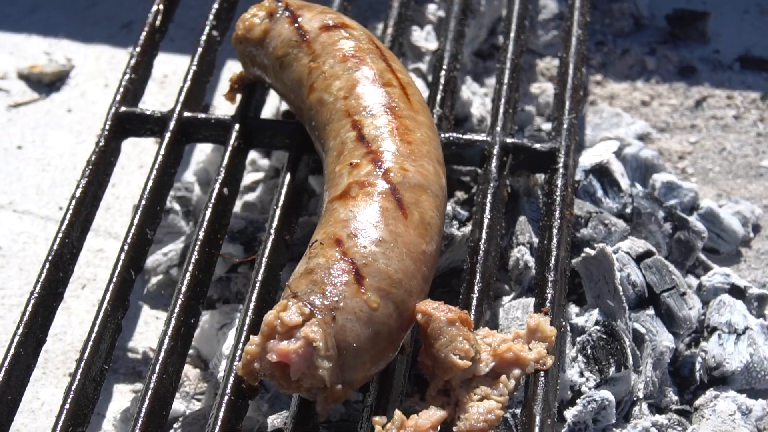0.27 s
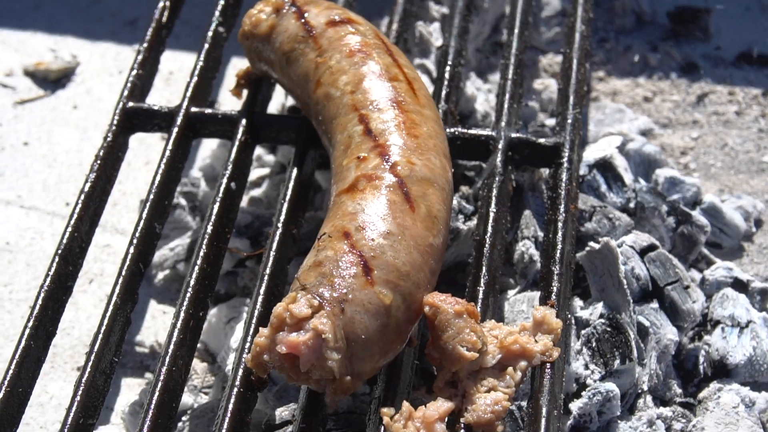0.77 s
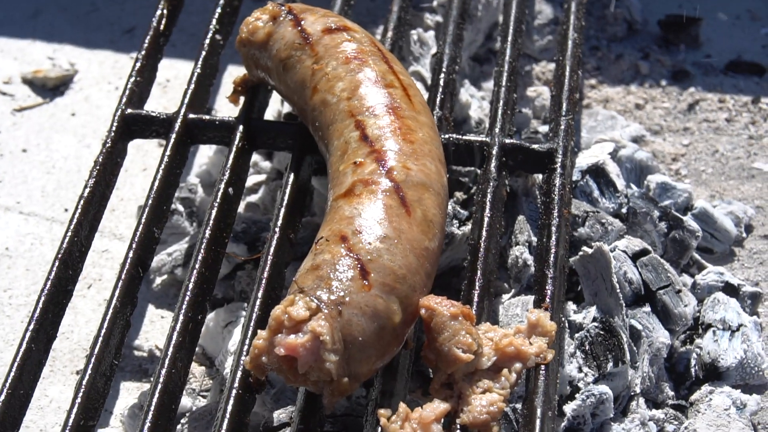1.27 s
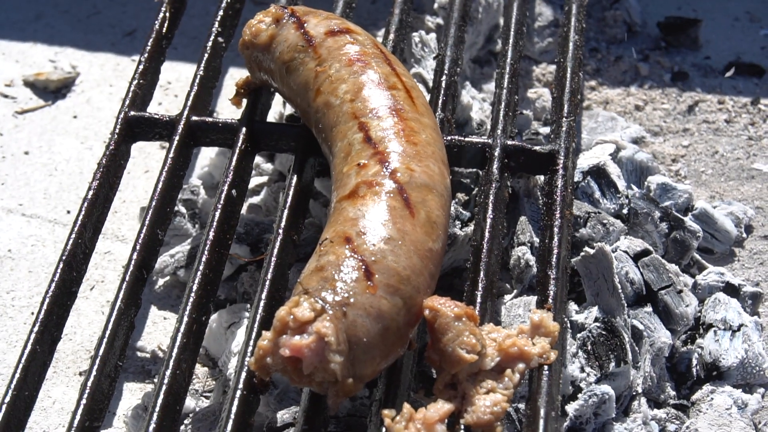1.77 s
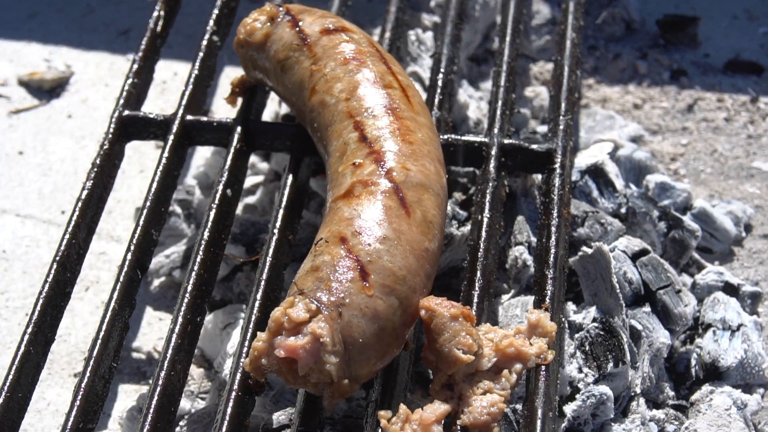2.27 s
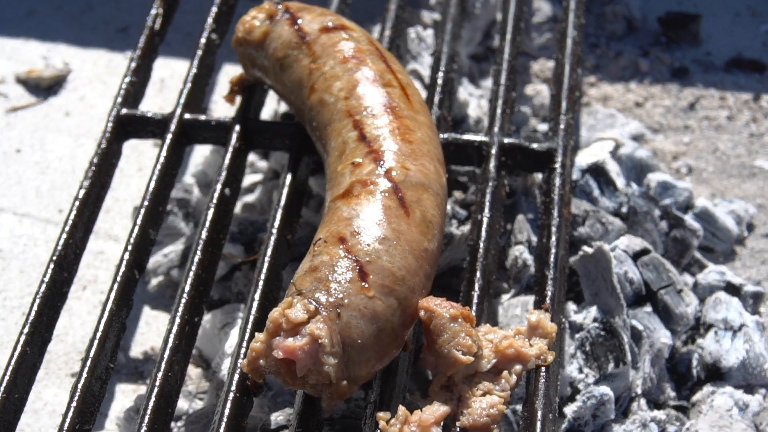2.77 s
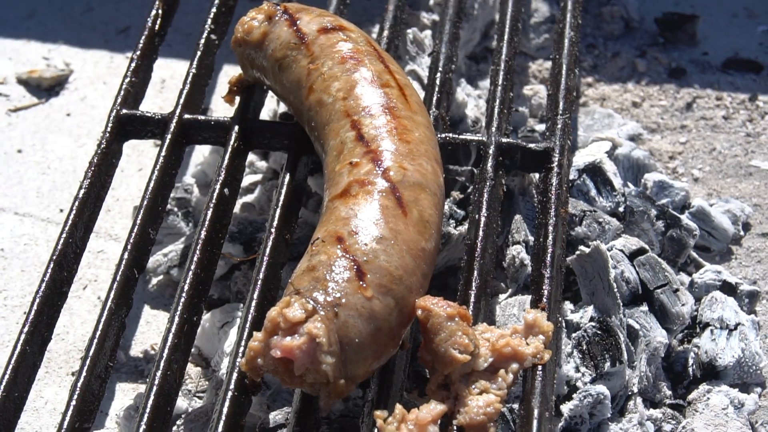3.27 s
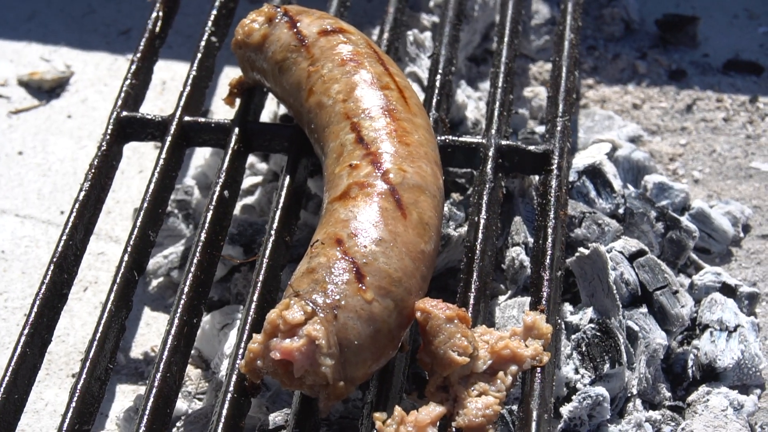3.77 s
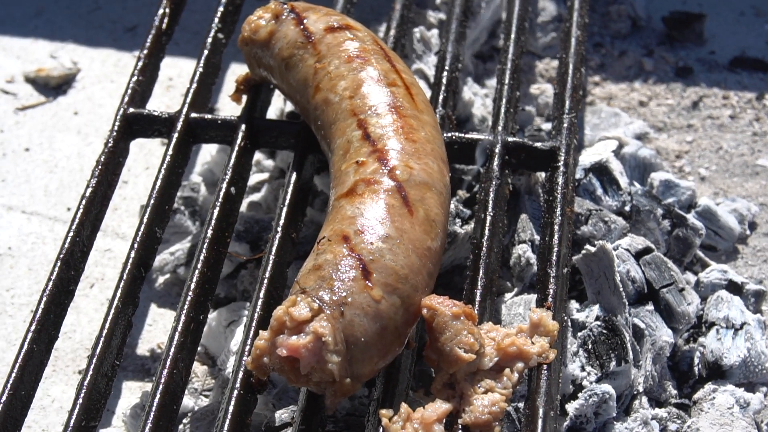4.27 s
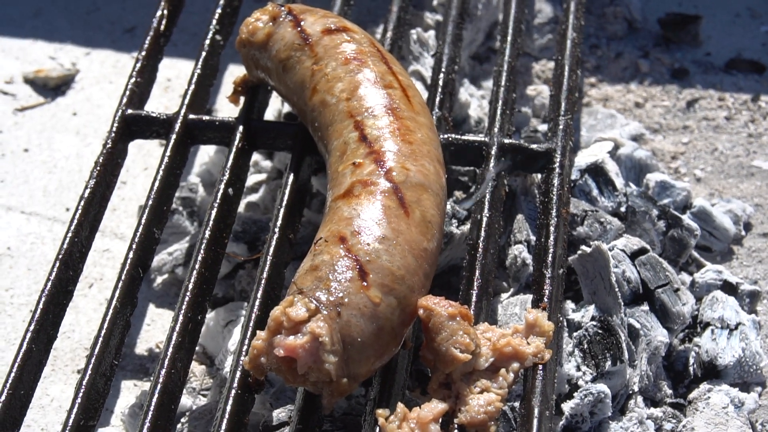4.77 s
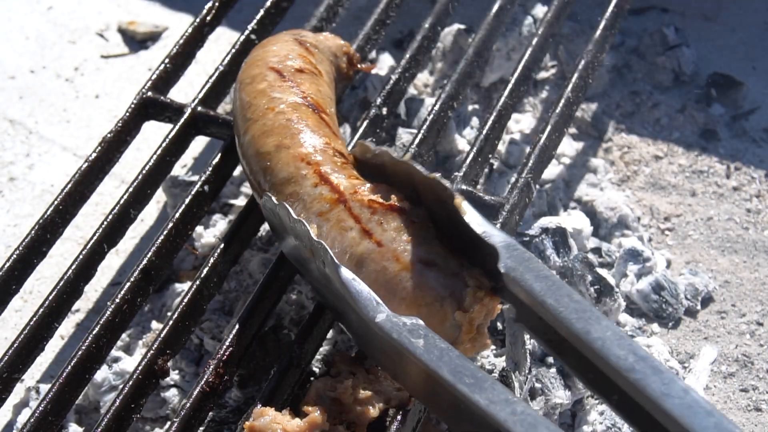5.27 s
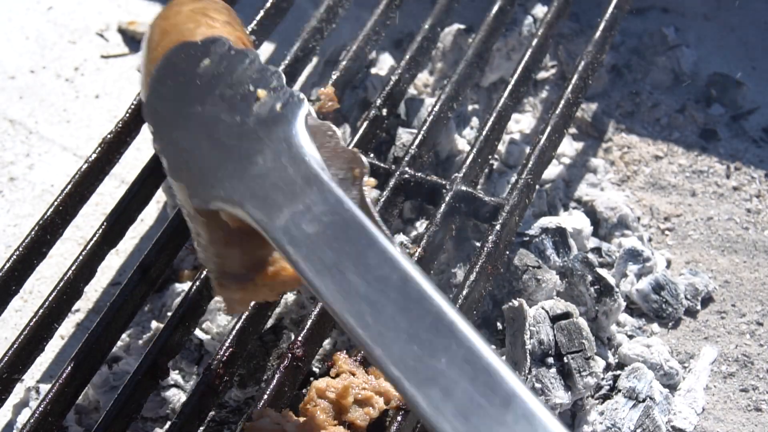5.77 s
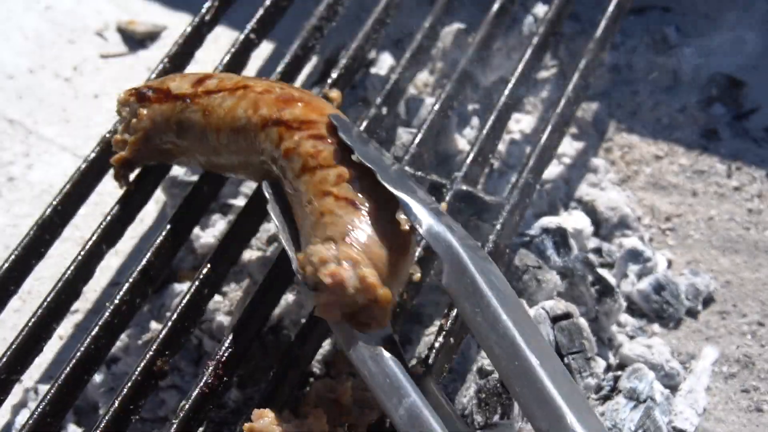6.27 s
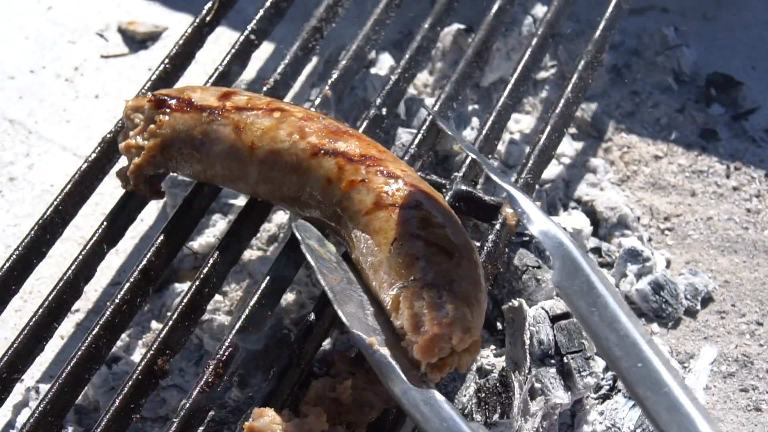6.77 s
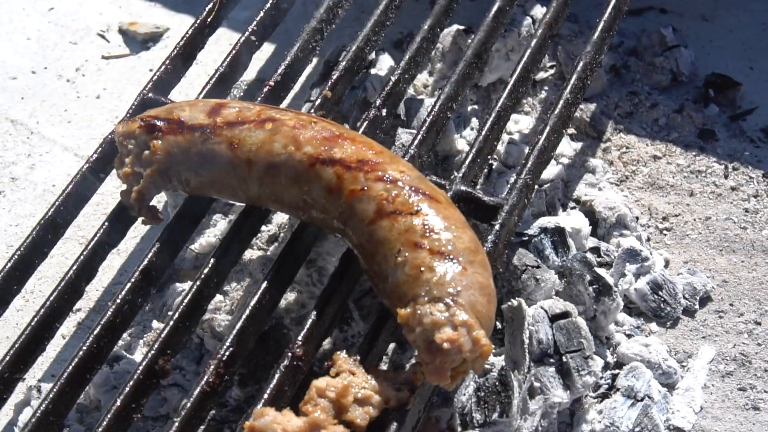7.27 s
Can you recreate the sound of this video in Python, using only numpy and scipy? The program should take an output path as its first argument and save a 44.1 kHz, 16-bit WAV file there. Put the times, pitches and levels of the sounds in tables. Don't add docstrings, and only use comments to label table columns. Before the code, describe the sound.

Sausage fat sizzles and spits close up over embers outdoors, wind thumping the microphone, while steel tongs knock the grate twice and frying grows livelier.

```python
import sys
import numpy as np
from scipy import signal
from scipy.fft import rfft, irfft, next_fast_len
from scipy.io import wavfile
from scipy.ndimage import uniform_filter1d

SR = 44100
rng = np.random.default_rng(int(sys.argv[2]) if len(sys.argv) > 2 else 0)


def magnitude_from_level(level_db):
    exponent = np.asarray(level_db, float) / 20
    return 10 ** exponent


def generate_wav(signal):
    frames = np.transpose(np.atleast_2d(signal))
    scaled = np.clip(frames, -1, 1) * 32767
    pcm = np.round(scaled).astype(np.int16)
    wavfile.write(sys.argv[1], SR, pcm)


N = 332073
PADDED = next_fast_len(N + SR // 2)

# (frequency [Hz], level [dB per Hz])
FAR_HUM = [(20, -1), (70, -4.5), (110, 3.5), (250, 0.5), (400, -2.5), (700, -22)]
FAR_HUM_DB = -61
# (frequency [Hz], level [dB per Hz])
WIND_SPECTRUM = [(8.8, -51.5), (15, -2.5), (40, -3), (65, -5), (90, -8.5), (150, -20), (300, -41.5),
                 (660, -100)]
# (time [s], level [dB])
BREEZE = [(0.0, -69), (0.19, -66), (0.46, -53), (0.62, -43.5), (1.6, -47), (1.95, -54), (2.35, -44),
          (2.75, -50), (3.05, -40), (3.44, -44), (3.7, -48.5), (4.05, -50), (4.36, -54), (4.78, -51),
          (5.2, -60.5), (6.08, -65.5), (6.82, -52), (7.5, -58.5)]
BREEZE_UPPER_DB = -10.5
# (time [s], peak [dB], length [s], upper part over deep part [dB])
GUSTS = [(0.254, -40, 0.029, -1), (0.367, -24.5, 0.032, -8), (0.516, -40.5, 0.058, -7.5),
         (0.803, -39.5, .08, -19), (.92, -58, 0.064, 4), (1.103, -46, 0.048, 7.5), (1.444, -53, 0.16, 8.5),
         (1.679, -29.5, 0.027, -9.5), (1.724, -52, 0.022, 7.5), (2.055, -47.5, .04, -1.5),
         (2.184, -27.5, 0.043, -12.5), (2.466, -51, 0.02, 11.5), (2.837, -47, 0.058, 7),
         (3.062, -42, 0.055, 5.5), (3.272, -46, 0.073, -14), (3.521, -33.5, 0.041, -6),
         (3.823, -54.5, 0.053, 5), (4.002, -40.5, .05, -2.5), (4.13, -47, .05, -5), (4.233, -47, 0.032, -4),
         (4.322, -52, 0.031, -2), (4.486, -53, 0.015, -1), (4.56, -48, 0.026, -8), (4.735, -52, 0.026, -7),
         (4.837, -50.5, 0.016, -2), (5.17, -58, 0.015, -16), (6.948, -40, 0.047, -15)]
# (frequency [Hz], level [dB per Hz])
CAPSULE_HISS = [(30, 7), (100, -3), (400, -3), (2000, -9.5), (5000, -8), (16000, -5)]
CAPSULE_HISS_DB = -64.5
# (time [s], peak [dB], brightness [dB per octave])
CRACK = [
    (.9432, -24, 5),
    (.9448, -11, 0),
]
# (frequency [Hz], level [dB], t60 [s])
EMBER_MODES = [(696, 2.5, 0.01), (890, -28, 0.021), (1110, 0.5, 0.018), (1580, 5.5, 0.0036),
               (2080, -10.5, 0.026), (2200, -4.5, 0.012), (3000, 13, 0.0026), (3790, 7.5, 0.004),
               (5130, -1, 0.0023), (6600, -4, .003), (8340, -3, 0.003), (10400, -11, 0.0028),
               (12900, -1, 0.0024)]
# (time [s], peak [dB], rattle t60 [s], bar ring [dB])
KNOCKS = [
    (5.205, -16, 0.041, -44.5),
    (5.2300, -48, 0.034, -57),
    (5.2475, -32, 0.075, -57),
    (6.3935, -16, 0.01, -47),
    (6.396, -22.5, 0.035, -58),
]
# (frequency [Hz], level [dB per Hz])
TONGS_STEEL = [(590, -63), (1000, -12.5), (1890, 1), (2210, -8), (3210, 1), (4460, -6), (4720, -7.5),
               (7180, -10.5), (7690, -8.5), (15000, -33)]
# (frequency [Hz], level [dB], t60 [s])
GRATE_MODES = [(554, -13, 0.046), (608, 3, 0.052), (720, -7, .04), (920, -6, 0.026), (1474, 1, 0.03),
               (1740, 0.5, .03), (1900, -1, .04), (2030, -1.5, 0.03), (2430, -5, 0.043)]
# (time [s], level [dB], t60 [s])
LONG_BAR = [
    (5.2038, -50, 0.77),
    (6.3955, -44, 0.4),
]
LONG_BAR_HZ = 316
# (frequency [Hz], level [dB per Hz])
HOUSING = [(180, -15.5), (300, -11.5), (480, -6.5), (680, -2.5), (930, -6.5), (1170, -4), (1500, -9),
           (2400, -7), (3000, -5.5), (3350, -0.5), (3850, -4.5), (4400, -12), (10300, -11.5), (15300, -11)]
SIZE_EDGES_HZ = [250, 2200, 4600, 10000]
# (time [s], length [s], level [dB])
SPUTTERS = [
    (4.833, 0.011, -43),
    (4.855, 0.015, -59),
    (6.304, 0.017, -39.5),
    (6.783, 0.014, -42),
    (6.91, 0.021, -53),
]
# (time [s], peak [dB], low part over high part [dB])
LOUD_SPITS = [(.0492, -23, -11), (.3548, -22.5, -20), (.4327, -24, -35), (.6265, -23, -25),
              (.6559, -20.5, -11), (.896, -22.5, -5), (1.0061, -29.5, -15), (1.2828, -25, -14),
              (1.3137, -20, -4), (1.8476, -36, -22), (2.0202, -22.5, -26), (2.0846, -24, -3),
              (2.1159, -28.5, -4), (2.2675, -26, -18), (2.437, -28.5, -8), (2.4508, -22.5, -8),
              (2.568, -22, -26), (2.7227, -21.5, -14), (2.9225, -22, -25), (3.127, -21.5, -9),
              (3.3086, -24.5, -1.5), (3.4364, -28, -28), (3.4437, -23, -24), (3.5638, -21, -3.5),
              (3.579, -23.5, -6), (3.6614, -19, -23.5), (3.8457, -25, -3), (3.8617, -24, -34),
              (4.2382, -12.5, -16.5), (4.465, -26, -0.5),
              (4.8607, -37, -26), (4.9268, -23.5, -30), (4.9874, -19.5, -11), (5.0055, -22, -26),
                 (5.098, -22, -25), (5.1108, -20.5, -25), (5.2309, -21, -6), (5.6162, -25, -5),
                 (5.66, -18.5, -20), (5.6949, -19, -30), (5.767, -17.5, -20), (5.796, -20, 1),
                 (5.8192, -26, -7), (5.9024, -16, -21), (5.9098, -18, -2), (5.981, -13.5, -13),
                 (6.0873, -29, 1), (6.172, -21.5, 4), (6.1858, -19, -22), (6.215, -20, -20),
                 (6.3068, -23, -18), (6.433, -18.5, -4.5), (6.5216, -19.5, -34), (6.6304, -22, -5.5),
                 (6.6932, -19.5, -20), (6.2826, -17, -16), (7.0976, -18.5, -4), (7.103, -17.5, -8),
                 (7.135, -17, -23), (7.4212, -16, -15)]
SMALL_SPIT_DB, SMALL_SPREAD_DB, SMALL_FOLLOWS = -34, 3.0, 0.94
SMALL_DEPTH_DB, DEPTH_SPREAD_DB = -19, 5
MIDDLE_DB, MIDDLE_FOLLOWS = -4.5, 0.33
SHINE_SPREAD_DB = 2.5
# (time [s], level [dB])
VIGOUR = [(0.0, 0.5), (0.85, -0.5), (1.01, -3), (1.42, -.5), (1.84, -.5), (2.65, 3.5), (3.09, -1),
          (3.45, 1), (3.92, -1), (4.4, -1), (4.82, -2.5), (4.84, 5), (5.42, 3.5), (6.2, 6.5), (6.75, 0.5),
          (6.9, 6), (7.1, 8.5), (7.53, 10)]
# (level at no vigour [dB], share of the vigour followed [ratio])
SIZES = [
    (-61.5, 0.78),
    (-57, 0.87),
    (-60.5, 1.39),
    (-53.5, 1.17),
]
# (start [s], end [s], centre [Hz], width [octaves], level [dB])
SHADES = [(.2, 4.82, 1170, 0.12, -0.5), (.2, 4.82, 5500, .08, 0), (.2, 4.82, 15000, .1, 2),
          (7.05, 7.6, 815, 0.32, 7.5), (5.3, 6.85, 15500, 0.13, -6), (2.4, 4, 13100, 0.2, 0),
          (4.842, 5.13, 13400, 0.16, 7), (5.243, 5.62, 10100, 0.21, -5), (5.3, 6.2, 2800, 0.13, 4),
          (5.7, 8, 2095, 0.55, 4), (6.95, 12, 7600, 0.1, 3)]


def rms_one(x):
    return x / np.sqrt(np.mean(x ** 2) + 1e-20)


def colour(x, spectrum):
    hz = np.fft.rfftfreq(16384, 1 / SR) + 1
    points_hz, points_db = np.array(spectrum, float).T
    cepstrum = irfft(np.log(magnitude_from_level(np.interp(np.log(hz), np.log(points_hz), points_db))))
    cepstrum[1:8192] *= 2
    cepstrum[8193:] = 0
    return signal.fftconvolve(x, irfft(np.exp(rfft(cepstrum))))[:N]


def band(x, edges_hz, order):
    octave = np.log2(np.fft.rfftfreq(PADDED, 1 / SR) + 1)
    above = []
    for edge_hz in edges_hz[order:order + 2]:
        ramp = np.clip(0.5 + 2 * (octave - np.log2(edge_hz)), 0, 1)
        above.append(np.sin(np.pi / 2 * ramp) ** 2)
    above.append(0)
    return irfft(rfft(x, PADDED) * (above[0] - above[1]), PADDED)[:N]


def split(x, edges_hz):
    return [band(x, edges_hz, order=k) for k in range(len(edges_hz))]


def drift(rate_hz):
    r = np.exp(-2 * np.pi * rate_hz / SR)
    return rms_one(signal.lfilter([1], [1, -2 * r, r * r], rng.standard_normal(N + SR))[SR:])


def evened(x, span_s):
    size = int(span_s * SR)
    power = uniform_filter1d(uniform_filter1d(x ** 2, size), size)
    return rms_one(x / np.sqrt(power + 1e-20))


def strikes(times_s, db):
    clicks = np.zeros(N)
    np.add.at(clicks, np.round(np.array(times_s) * SR).astype(int), magnitude_from_level(np.array(db)))
    return clicks


def fade(clicks, t60_s):
    return signal.lfilter([1], [1, -magnitude_from_level(-60 / (t60_s * SR))], clicks + 1e-18)


def ring(clicks, hz, t60_s):
    r, w = magnitude_from_level(-60 / (t60_s * SR)), 2 * np.pi * hz / SR
    return signal.lfilter([0, np.sin(w)], [1, -2 * r * np.cos(w), r * r], clicks + 1e-18)


def bursts(per_s, spread_db, clump_db, spray_t60_s):
    sizes = magnitude_from_level(spread_db * np.minimum(rng.exponential(1, N), 3)) * rng.choice([-1, 1], N)
    clicks = sizes * (rng.random(N) < per_s * magnitude_from_level(clump_db * drift(35)) / SR)
    spray = rng.standard_normal(N) * fade(np.abs(clicks), spray_t60_s)
    return rms_one(clicks + 0.45 * spray)


def far_hum():
    return magnitude_from_level(FAR_HUM_DB) * rms_one(colour(rng.standard_normal(N), FAR_HUM))


def wind_strength():
    t = np.arange(0, N / SR, 0.002)
    s, db, length_s, sharp_db = np.transpose(GUSTS)[:, :, None]
    breeze = magnitude_from_level(np.interp(t, *np.transpose(BREEZE)))
    swells = magnitude_from_level(db) * np.exp(-((t - s) / length_s) ** 2)
    deep = breeze + swells.sum(axis=0)
    upper = magnitude_from_level(BREEZE_UPPER_DB) * breeze + (magnitude_from_level(sharp_db) * swells).sum(axis=0)
    return [np.interp(np.arange(N) / SR, t, gain) for gain in (deep, upper)]


def wind():
    deep, upper, flutter = split(colour(rng.standard_normal(N), WIND_SPECTRUM), [12, 60, 130])
    deep_gain, upper_gain = wind_strength()
    puffs = drift(31)
    deep = magnitude_from_level(0.4 * drift(14)) * evened(deep, 0.23)
    upper = magnitude_from_level(0.89 * puffs) * evened(upper, 0.18) + magnitude_from_level(4.64 * puffs - 13.5) * rms_one(flutter)
    return deep_gain * deep + upper_gain * upper


def capsule_hiss():
    return magnitude_from_level(CAPSULE_HISS_DB) * rms_one(colour(rng.standard_normal(N), CAPSULE_HISS))


def ember():
    s, db, bright_db = np.transpose(CRACK)
    out = 0
    for k, (hz, level_db, t60_s) in enumerate(EMBER_MODES):
        mode_db = db + level_db - 11.5 + bright_db * np.log2(hz / 3000)
        out = out + (-1) ** k * ring(strikes(s, mode_db), hz, t60_s)
    return out


def long_bar():
    size = int(0.012 * SR)
    swing_up = signal.windows.hann(size) * np.sin(2 * np.pi * LONG_BAR_HZ * np.arange(size) / SR)
    swing_up = swing_up / np.sum(swing_up ** 2)
    out = 0
    for s, db, t60_s in LONG_BAR:
        push = np.convolve(strikes([s], [db]), swing_up)[:N]
        out = out + ring(push, LONG_BAR_HZ, t60_s)
    return out


def tongs():
    steel = rms_one(colour(rng.standard_normal(N), TONGS_STEEL))
    s, db, t60_s, bar_db = np.transpose(KNOCKS)
    rattle = sum(fade(strikes([a], [b - 8]), c) for a, b, c in zip(s, db, t60_s))
    crack = colour(strikes(s, db - 1.0), TONGS_STEEL)
    crack = crack / np.abs(colour(strikes([0], [0]), TONGS_STEEL)).max()
    push = strikes(s, bar_db)
    push = 0.44 * push + 0.084 * rng.standard_normal(N) * fade(push, 0.14)
    grate = sum(magnitude_from_level(level_db) * ring(push, hz, ring_s) for hz, level_db, ring_s in GRATE_MODES)
    return steel * rattle + crack + grate


def sputters():
    t = np.arange(N) / SR
    gate = 0
    for s, length_s, db in SPUTTERS:
        rise, fall = (t - s) / 0.00078, (s + length_s - t) / 0.0055
        gate = gate + magnitude_from_level(db) * np.clip(np.minimum(rise, fall), 0, 1)
    return gate * rms_one(colour(bursts(2500, 3.0, 1.5, 0.002), HOUSING))


def small_spits(count):
    s, chance = rng.random(count) * (N - 1) / SR, rng.standard_normal((count, 2))
    vigour_db = np.interp(s, *np.transpose(VIGOUR))
    db = SMALL_SPIT_DB + SMALL_FOLLOWS * vigour_db + SMALL_SPREAD_DB * chance[:, 0]
    return np.transpose([s, db, SMALL_DEPTH_DB + DEPTH_SPREAD_DB * chance[:, 1]])


def spits():
    s, high_db, depth_db = np.concatenate([LOUD_SPITS, small_spits(count=480)]).T
    low_db = high_db + depth_db
    middle_db = high_db + MIDDLE_DB + MIDDLE_FOLLOWS * depth_db
    shine_db = SHINE_SPREAD_DB * rng.uniform(-0.21, 1, len(s))
    parts_db = [low_db - 12.5, middle_db - 5.5, high_db - 11.0 - shine_db, high_db - 5.5 + shine_db]
    spray, out = rng.standard_normal(N), 0
    unit = split(colour(strikes([1.0], [0.0]), HOUSING), SIZE_EDGES_HZ)
    for k, db in enumerate(parts_db):
        clicks = strikes(np.maximum(s - 0.0002, 0), db)
        source = clicks + spray * (0.089 * fade(clicks, 0.0037) + 0.045 * fade(clicks, 0.023))
        out = out + band(source, SIZE_EDGES_HZ, order=k) / np.abs(unit[k]).max()
    return colour(out, HOUSING)


def shade(x):
    t, hz, spectrum = np.arange(N) / SR, np.fft.rfftfreq(PADDED, 1 / SR) + 1, rfft(x, PADDED)
    for start, end, centre_hz, octaves, db in SHADES:
        bell = np.exp(-(np.log2(hz / centre_hz) / octaves) ** 2)
        region = irfft(spectrum * bell, PADDED)[:N]
        present = np.clip(np.minimum(t - start, end - t) / 0.0073, 0, 1)
        x = x + (magnitude_from_level(db) - 1) * present * region
    return x


def sizzle():
    broad, out = bursts(700, 2.8, 2.4, 0.0043), 0
    vigour_db = np.interp(np.arange(N) / SR, *np.transpose(VIGOUR))
    own_db, steam_db = [-7.0, -3.5, -14.0, 2], [-0.5, -3.0, 0.5, -2.5]
    lift_db = [1.6, 1.8, 0.92, 0.82]
    for k, (base_db, share) in enumerate(SIZES):
        own = magnitude_from_level(own_db[k]) * bursts(1100, 2.7, 2.5, 0.0028)
        steam = magnitude_from_level(steam_db[k]) * rng.standard_normal(N)
        part = band(colour(broad + own + steam, HOUSING), SIZE_EDGES_HZ, order=k)
        out = out + magnitude_from_level(base_db + share * vigour_db + lift_db[k]) * rms_one(part)
    return shade(out)


def scene():
    background = far_hum() + wind()
    middle = background + ember() + long_bar() + tongs() + sputters() + spits() + sizzle()
    side = capsule_hiss()
    return np.array([middle + side, middle - side])


def top_cut(x):
    return signal.sosfilt(signal.butter(12, 17030, fs=SR, output="sos"), x)


def record(dry):
    low_pass = signal.ellip(12, 0.5, 65, 15830, fs=SR, output="sos")
    mix = signal.sosfilt(low_pass, dry)
    return top_cut(mix)


dry = scene()
out = record(dry)
generate_wav(out)
```